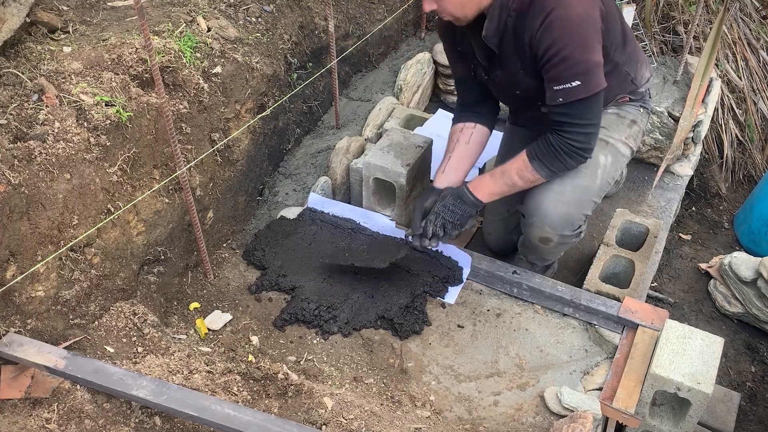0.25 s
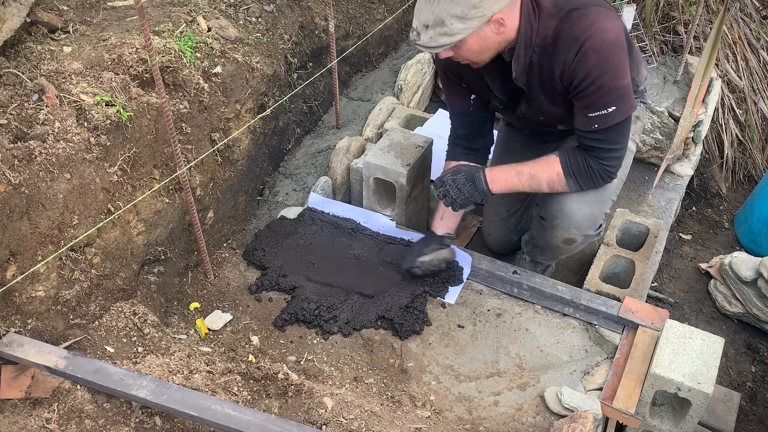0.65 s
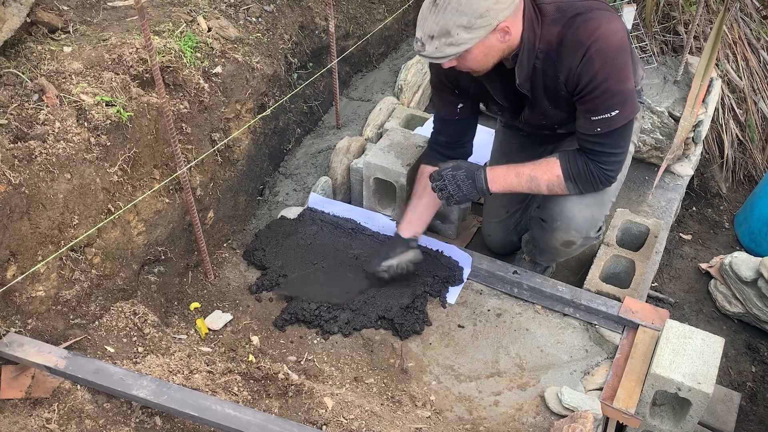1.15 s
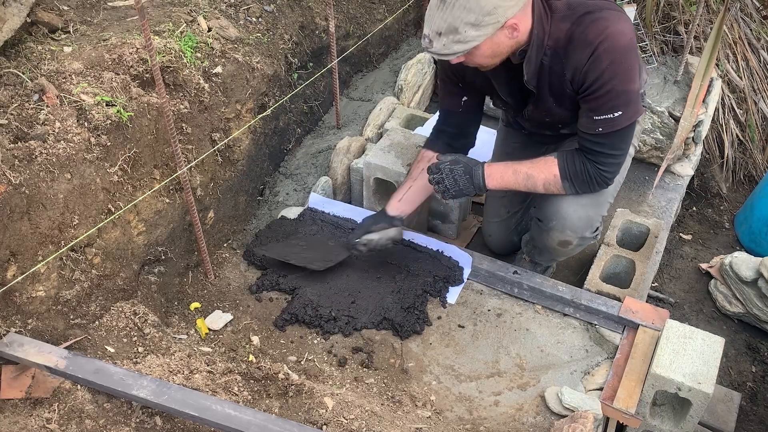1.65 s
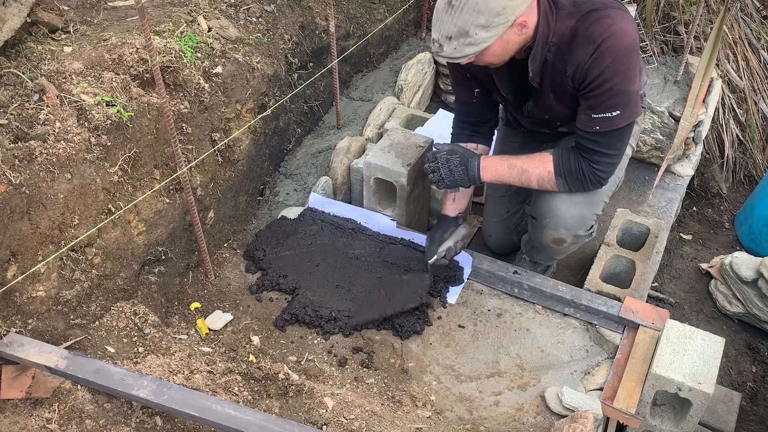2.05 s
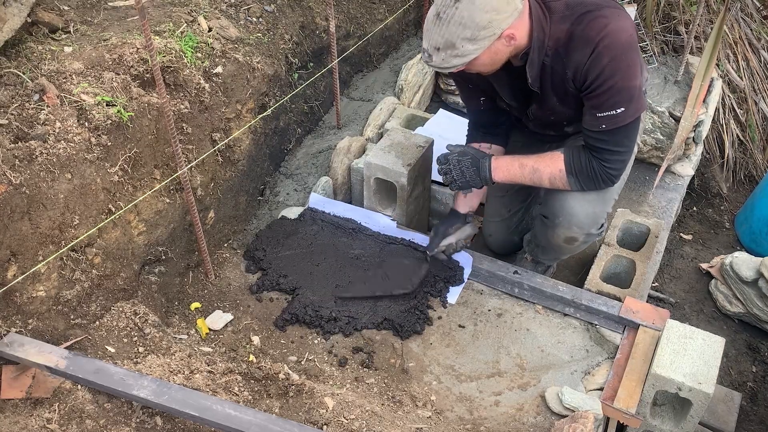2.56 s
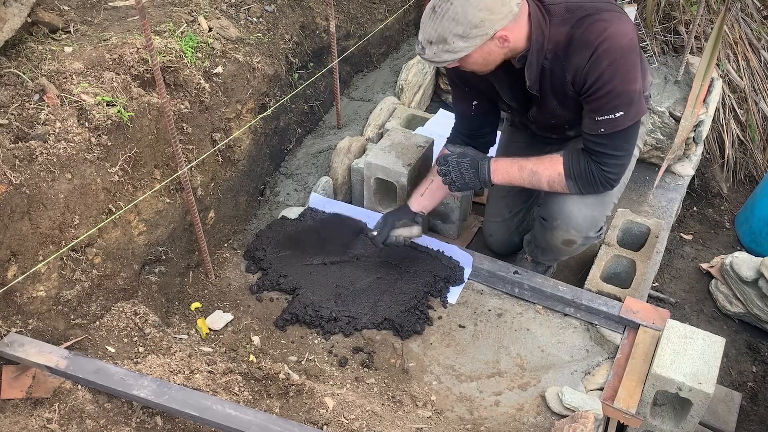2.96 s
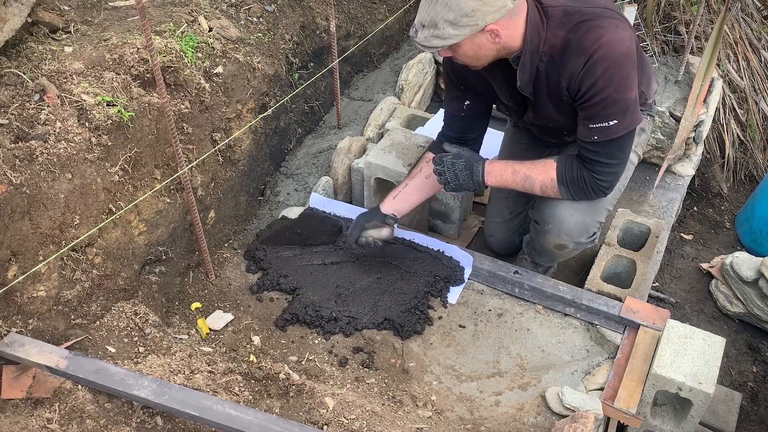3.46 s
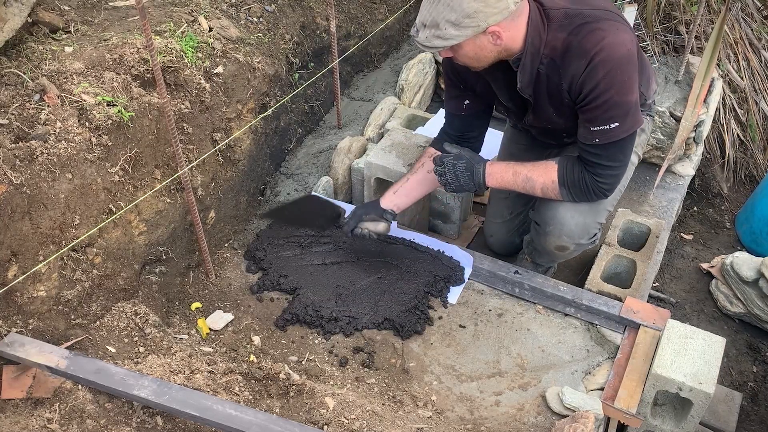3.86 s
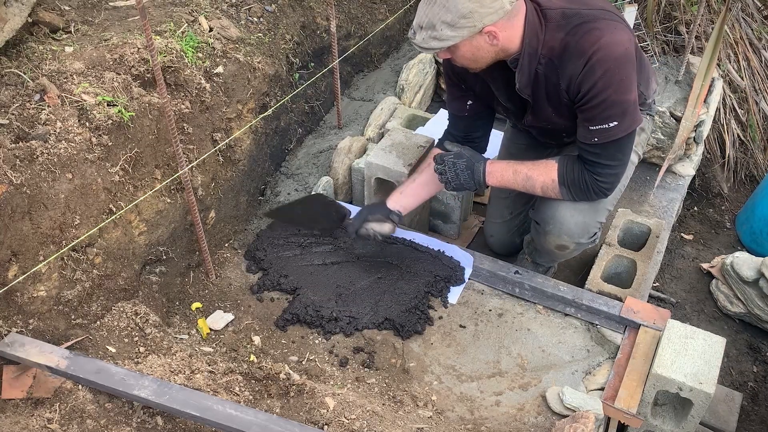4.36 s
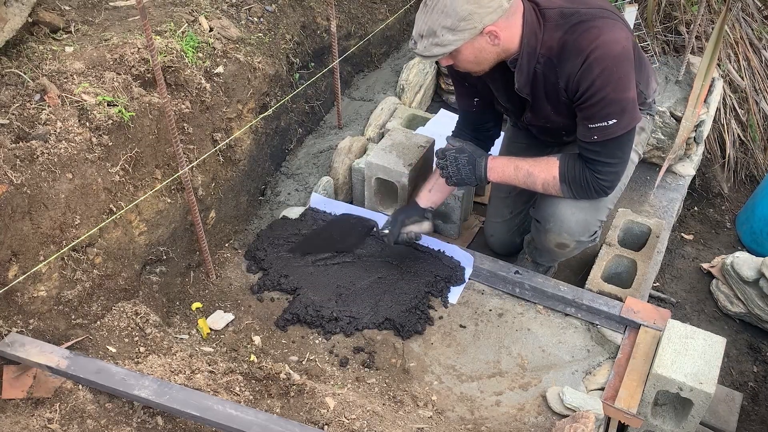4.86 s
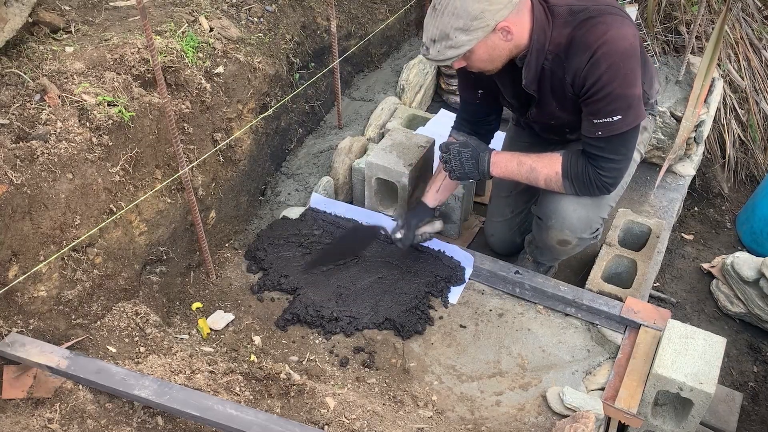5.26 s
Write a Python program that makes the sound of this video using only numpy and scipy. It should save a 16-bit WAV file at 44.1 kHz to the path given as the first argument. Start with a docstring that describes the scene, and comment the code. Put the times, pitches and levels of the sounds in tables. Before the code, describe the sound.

A steel trowel scrapes gritty wet concrete in short strokes, then pats it with quick wet slaps, outdoors over faint machine hum.

```python
"""A steel trowel works a heap of wet concrete in a shallow trench outdoors: gritty strokes spread it, built from
dense random ticks, coloured by sand, grit and steel. Between and after them the flat blade pats, at last about
six times a second: noise bursts spit, smack and knock, a falling sine thuds, and low modes ring in the base.
Stones click, paste fizzes off the steel, and the trench answers with short echoes made of decaying noise.
Behind lie noisy outdoor air and the hum of a far machine; a close pair of microphone ports picks it all up."""
import sys
import numpy as np
from scipy import signal
from scipy.fft import rfft, irfft, next_fast_len
from scipy.io import wavfile
from scipy.ndimage import uniform_filter1d, map_coordinates

SR = 44100
rng = np.random.default_rng(int(sys.argv[2]) if len(sys.argv) > 2 else 0)


def transcribe(u):
    """Save the signal u as a 16-bit wav file named by the first command-line argument.

    u: samples, shape (n,) or (channels, n), limited to [-1, 1]; the rate is SR.
    q: integer samples, one column per channel.
    """
    v = np.clip(np.atleast_2d(u).T, -1, 1)
    q = np.round(v * 32767).astype(np.int16)
    wavfile.write(sys.argv[1], SR, q)


N = 242991

# The blade spreads the heap: start_s, rise_s (time to full speed), length_s (rise included),
# level_db (relative peak), rise_db (swell up to the peak), wedge_hz (air wedge at full speed)
STROKE_MOVES = [(0.592, 0.11, 0.16, -21.5, 25, 2020), (0.781, 0.044, 0.11, -34, 3.5, 1893),
                (1.198, 0.073, 0.23, -24.5, 7.5, 2630), (1.794, 0.063, .22, -21, 10, 2890)]
# Fine sand ticking on steel: freq_hz, density_db (relative, per Hz)
SAND_SPECTRUM = [(3000, -30.5), (5000, -11), (6200, 0), (7200, 0), (8800, -3), (10500, -6), (12500, -9),
                 (15500, -15)]
# Coarser grit rasping on steel: freq_hz, density_db (relative, per Hz)
GRIT_SPECTRUM = [(500, -32.5), (900, -10), (1300, -4.5), (1900, -2.5), (3300, -0.5), (4200, -0.5),
                 (5500, -7), (8000, -31)]


def amp(db):
    """Decibels to gain."""
    return 10 ** (np.asarray(db) / 20)


def unit(x):
    """Scale to rms 1."""
    return x / np.sqrt(np.mean(x ** 2) + 1e-20)


def along(points, hz):
    """Interpolate (Hz, value) points on a log frequency axis."""
    f, v = np.transpose(points)
    return np.interp(np.log(hz + 1), np.log(f + 1), v)


def wobble(rate):
    """A smooth random curve, rate knots a second."""
    knots = rng.standard_normal(int(N * rate / SR) + 4)
    fine = np.arange(0, len(knots) - 1, 1 / 10)
    curve = map_coordinates(knots, [fine])
    return np.interp(np.arange(N) * rate / SR, fine, curve)


def filtered(x, response):
    """x times a complex response of frequency."""
    n = x.shape[-1]
    m = next_fast_len(n + 4096)
    return irfft(rfft(x, m) * response(np.fft.rfftfreq(m, 1 / SR)), m)[..., :n]


def causal(x, gain):
    """x through the minimum-phase filter of a gain over frequency: nothing sounds before its cause."""
    def response(f):
        cepstrum = irfft(np.log(np.abs(gain(f)) + 1e-6))
        half = len(cepstrum) // 2
        folded = np.r_[cepstrum[0], 2 * cepstrum[1:half]]
        return np.exp(rfft(folded, len(cepstrum)))
    return filtered(x, response)


def resonance(f, hz, width):
    """Response of one damped mode, 1 at its centre."""
    return 1j * f * width / (hz * hz - f * f + 1j * f * width)


def blade(f, ring_db=-5):
    """The damped steel plate adds its modes to whatever touches it."""
    # Modes of the plate: mode_hz, width_hz, level_db (relative)
    plate_modes = [(1560, 400, 2), (2650, 150, -3.5), (3030, 900, 2), (6700, 550, 0), (12190, 150, -25)]
    ring = sum(amp(db) * resonance(f, hz, width) for hz, width, db in plate_modes)
    return 1 + amp(ring_db) * ring


def coloured(x, spectrum):
    """x with the given spectrum and the colour of the blade, rms 1."""
    return unit(causal(x, lambda f: amp(along(spectrum, f)) * blade(f)))


def crackle(n, rate, spread_db):
    """Random ticks, rate a second on average, a few larger than the rest; rms 1."""
    size = amp(spread_db * np.minimum(rng.exponential(size=n), 3.5))
    return unit((rng.random(n) < rate / SR) * rng.choice([-1, 1], n) * size)


def strokes():
    """Sand and grit tick under the sliding blade, which catches and slips on the gravel."""
    # Low drag of the heap: freq_hz, density_db (relative, per Hz)
    drag_spectrum = [(60, -24.5), (140, -10.5), (270, -0.5), (450, -4.5), (620, -5), (800, -4.5),
                     (1100, -11.5), (2000, -26)]
    sand, grit, drag = contact()
    catch = amp(1.1 * wobble(50) + 1.1 * wobble(300))  # slow and fast unevenness
    gravel = crackle(N, rate=600, spread_db=2.6)  # shared by all three layers

    def grains(rate):
        return crackle(N, rate, spread_db=2) + .4 * gravel

    fine = amp(-1.0) * sand * coloured(grains(12000), SAND_SPECTRUM)
    rasp = shifting(coloured(grains(5000), GRIT_SPECTRUM), patchy_db=1.6, wedge_db=8.5)
    coarse = amp(1.5) * grit * rasp
    heap = amp(-2.5) * drag * coloured(grains(2500), drag_spectrum)
    return catch * (fine + coarse + heap)


def contact():
    """Gains of sand, grit and drag: all follow stroke effort; brushes add sand and grit, scuffs add drag."""
    # The blade brushes the surface lightly or flicks off it:
    # middle_s, length_s, sand_db (relative), grit_db (relative)
    brushes = [(0.016, 0.078, -43.5, -54.5), (0.242, 0.029, -56, -56), (0.324, 0.15, -56.5, -58.5),
               (0.414, 0.035, -44, -58), (0.526, 0.074, -59, -70.5), (0.962, 0.022, -50.5, -64.5),
               (1.496, 0.013, -39, -45.5), (2.036, 0.011, -41, -38), (2.068, 0.0093, -43.5, -52),
               (2.703, 0.3, -65.5, -70.5)]
    # The kneeling worker shifts with a soft scuff: middle_s, length_s, level_db (relative)
    scuffs = [(0.167, 0.05, -52), (0.219, 0.019, -46), (0.318, 0.25, -62.5), (0.412, 0.034, -52)]
    slowing_db_per_s, lift_db_per_s = 84, 429.5  # the arm slows, then the blade lifts
    grit_db = -4.5  # against sand
    usual_stroke_db, drag_db, drag_growth = -27, -42.5, 0.6  # growth: drag dB per dB of effort
    effort = sum(amp(db) * gesture(s, rise_s, length, rise_db, slowing_db_per_s, lift_db_per_s)
                 for s, rise_s, length, db, rise_db, _ in STROKE_MOVES)
    sand, grit = effort, amp(grit_db) * effort
    for s, length, brush_sand_db, brush_grit_db in brushes:
        touch = hump(s, length)
        sand = sand + amp(brush_sand_db) * touch
        grit = grit + amp(brush_grit_db) * touch
    drag = amp(drag_db) * (effort / amp(usual_stroke_db)) ** drag_growth
    scuffing = sum(amp(db) * hump(s, length) for s, length, db in scuffs)
    return sand, grit, drag + scuffing


def gesture(start, rise_s, length, rise_db, fade_db_per_s, release_db_per_s):
    """Gain that swells to 1, fades slowly until its length is up, and is then released."""
    age = np.arange(N) / SR - start
    rising = rise_db * np.clip(1 - age / rise_s, 0, 1)
    fading = fade_db_per_s * np.maximum(np.minimum(age, length) - rise_s, 0)
    released = release_db_per_s * np.maximum(age - length, 0)
    onset = np.exp(np.minimum(age, 0) / 0.0019)
    return amp(-rising - fading - released) * onset


def hump(middle, length):
    """Gain of one brief, rounded touch."""
    edge = 1.6  # the higher, the more abruptly it starts and stops
    return np.exp(-np.abs((np.arange(N) / SR - middle) / (length / 2)) ** edge)


def shifting(x, patchy_db, wedge_db):
    """The contact patch wanders, so the colour flickers; the air wedge under the blade adds a moving resonance."""
    hz, t, z = signal.stft(x, SR, nperseg=512)
    noise = rng.standard_normal(z.shape)
    field = uniform_filter1d(uniform_filter1d(noise, 4, 0), 4, 1)  # smooth over pitch, then time
    centre = wedge_pitch(t)
    depth = (2300 / centre) ** 2  # a long, low wedge rings more strongly
    wedge = depth * np.abs(resonance(hz[:, None], centre, 170)) ** 2
    colour = amp(patchy_db * unit(field) + wedge_db * wedge)
    return unit(signal.istft(z * colour, SR, nperseg=512)[1][:N])


def wedge_pitch(t):
    """In each stroke the note of the air wedge sinks as the blade flattens, and stays there until the next."""
    fall_oct_per_s = 2.0
    centre = np.full(len(t), float(STROKE_MOVES[0][-1]))
    for s, rise_s, length, _, _, hz in STROKE_MOVES:
        past_peak = np.minimum(t - s, length) - rise_s
        centre = np.where(t > s, hz * 2 ** (-fall_oct_per_s * past_peak), centre)
    return centre


def pats():
    """Every landing of the blade slaps the paste, thuds in the heap and shakes the base."""
    # The blade lands: touch_s, settle_s (time to lie flat), slap_db (relative), gap_hz (air gap),
    # thud_db (relative), thud_hz (nominal, before the glide)
    landings = [(0.5728, 0.006, -39, 2720, -53.5, 290), (1.1865, .0036, -27.5, 2860, -56.5, 235.2),
                (1.4825, 0.0072, -59.5, 2830, -64, 214.3), (1.7768, 0.0027, -30, 2810, -29.5, 254),
                (2.2261, 0.001, -23.5, 2030, -25.5, 257), (2.3745, 0.0029, -36, 2350, -40, 262),
                (2.5124, .0027, -35, 2570, -38, 258.5), (2.9306, 0.0081, -34.5, 1577, -45.5, 355),
                (3.119, .0063, -30.5, 2910, -44, 364.7), (3.3139, 0.0062, -32.5, 1510, -40.5, 280),
                (3.505, .0021, -31.5, 1347, -37, 282.7), (3.6775, 0.0052, -34, 2880, -48.5, 293),
                (3.8408, 0.008, -32.5, 2900, -44, 275.5), (4.0024, .011, -35, 1390, -47, 277),
                (4.1582, 0.0065, -36, 2880, -46, 272), (4.3309, 0.0075, -33, 1250, -50.5, 348),
                (4.503, 0.0079, -34.5, 2400, -36, 309.6), (4.6673, 0.0057, -29, 2670, -49.5, 308.4),
                (4.829, .0088, -31.5, 1810, -45, 273), (4.9792, .01, -32.5, 1660, -48, 256.8),
                (5.1634, .0034, -25, 2590, -44, 232.9), (5.3378, 0.0031, -24.5, 1620, -30.5, 323),
                (5.5066, .0048, -33, 1550, -59, 282)]
    # Patting moves on to wetter paste, then back: time_s, wetness (-1 to 1, no unit)
    wetness_curve = [(2.2, -1), (2.5, -0.6), (2.95, 0.32), (3.5, 0.99), (4.5, 0.73), (5.15, 0.7),
                     (5.4, 0.1)]
    usual_slap_db, usual_thud_db = -33.5, -44  # an ordinary pat
    spit_usual_db, spit_growth = -29, 0.88  # growth: dB per dB of slap
    knock_usual_db, knock_growth, knock_per_thud = -43, 1.31, .12  # dB per dB of slap and of thud
    ground_usual_db, ground_growth = -54, 0.8  # growth: dB per dB of thud
    wet_spit_db, sizzle_usual_db, wet_sizzle_db = 4, -2, 4  # wetter paste spits more, and finer
    burst_s, usual_settle_s, burst_power = .0025, .006, 0.6  # a tilted landing draws the burst out
    out, lead = np.zeros(N + SR), SR // 50
    t = np.arange(-lead, SR // 8) / SR  # 0 where the blade lies flat
    for s, settle, slap_db, gap_hz, thud_db, thud_hz in landings:
        at = round((s + settle) * SR)
        half = burst_s * (abs(settle) / usual_settle_s) ** burst_power
        faster, firmer = slap_db - usual_slap_db, thud_db - usual_thud_db
        wetness = np.interp(s, *np.transpose(wetness_curve))
        spit_db = spit_usual_db + spit_growth * faster + wet_spit_db * wetness
        sizzle_db = sizzle_usual_db + wet_sizzle_db * wetness
        knock_db = knock_usual_db + knock_growth * faster + knock_per_thud * firmer
        ground_db = ground_usual_db + ground_growth * firmer
        hit = slap(t, settle, half, spit_db, sizzle_db, slap_db, gap_hz, knock_db)
        out[at - lead:][:len(t)] += hit + thud(t, half, thud_db, thud_hz)
        base = ground(ground_db)
        out[at:][:len(base)] += base
    return out[:N]


def slap(t, settle, half, spit_db, sizzle_db, smack_db, gap_hz, knock_db):
    """The edge touches, the gap closes and paste and air squirt out: a burst of milliseconds, then a wet fizz."""
    # Spray of paste: freq_hz, density_db (relative, per Hz)
    spit_spectrum = [(2500, -43.5), (4500, -16.5), (5500, -14), (6300, -2), (8200, -6.5), (10000, -7),
                     (13000, -9.5), (15500, -13.5)]
    # Air squeezed from the gap: freq_hz, density_db (relative, per Hz)
    smack_spectrum = [(600, -26.5), (1000, -1), (1500, -1), (2700, -1.5), (4000, -4), (5500, -6.5),
                      (9000, -34.5)]
    # Low knock of the landing: freq_hz, density_db (relative, per Hz)
    knock_spectrum = [(90, -45), (150, -18), (220, 2), (330, -3.5), (480, 0), (580, 0), (750, -1.5),
                      (1050, -10), (1300, -4.5), (2500, -38.5)]
    swell = (t / (1.64 * half)) ** 2
    decay = np.abs(t) / (2.15 * half)
    burst = np.exp(-np.where(t < 0, swell, decay))
    # the edge's first touch, held until the blade lies flat
    touch = 0.41 * np.exp(np.minimum(t + settle - .0005, 0) / 0.00054) * (t < 0)
    fizz = amp(-20.5) * (t > 0) * amp(-60 * np.abs(t) / 0.11)
    wet = np.maximum(burst, touch) + fizz

    def squirt(shape):
        return shape * crackle(len(t), rate=15000, spread_db=0.7)

    # wetter paste sprays finer: a treble tilt
    spray = filtered(squirt(wet), lambda f: amp(sizzle_db * along([(7500, 0), (13000, 1)], f)))
    gap = filtered(squirt(wet), lambda f: 1 + resonance(f, gap_hz, 450))
    spit = amp(spit_db - 8.0) * coloured(spray, spit_spectrum)
    smack = amp(smack_db - 10.0) * coloured(gap, smack_spectrum)
    knock = amp(knock_db - 8.5) * coloured(squirt(burst + fizz), knock_spectrum)
    return spit + smack + knock


def thud(t, half, db, hz):
    """The blade's note drops as the heap loads it; a firm press rings longer."""
    age = np.maximum(t + 0.66 * half, 0)
    fast_drop = 1 + 2 * np.exp(-age / 0.0022)
    slow_drop = .86 + 0.192 * np.exp(-age / 0.0087)
    pitch = hz * fast_drop * slow_drop
    t60 = 0.028 * amp(0.038 * (db + 35))
    swell = (1 - np.exp(-age / 0.011)) ** 2
    note = np.sin(2 * np.pi * np.cumsum(pitch) / SR)
    return amp(db - 5.5) * unit(note * swell * amp(-60 * age / t60))


def ground(db):
    """The packed base under the heap rings in a few low modes, varied at random for each pat."""
    # Modes of the packed base: mode_hz (nominal), level_db (relative), t60_s
    base_modes = [(103.8, -9.5, 0.42), (136.5, -2, 0.17), (192, 6.5, 0.069)]
    age = np.arange(SR // 3) / SR
    base = np.zeros(len(age))
    for hz, mode_db, t60 in base_modes:
        decay = amp(mode_db + rng.normal(0, 4.7) - 60 * age / t60)
        base += decay * np.sin(2 * np.pi * hz * rng.normal(1, 0.085) * age)
    swell = 1 - np.exp(-age / 0.0032)
    return amp(db - 6.0) * unit(base * swell)


def stones():
    """Single stones click against the steel: decaying noise snaps with the colours of sand and grit."""
    # A stone snaps out from under the edge: time_s, level_db (relative)
    snaps = [(0.717, -17), (1.2761, -23), (1.647, -54.5), (1.9299, -19.5), (2.0273, -24)]
    out, t = np.zeros(N + SR), np.arange(SR // 50) / SR
    for s, db in snaps:
        snap = rng.standard_normal(len(t)) * amp(-60 * t / 0.016)
        click = coloured(snap, SAND_SPECTRUM) + amp(-9.0) * coloured(snap, GRIT_SPECTRUM)
        out[round(s * SR):][:len(t)] += amp(db - 12.5) * click
    return out[:N]


def peels():
    """Wet paste fizzes as it lets go of the steel: crackle that swells, then dies fast."""
    # The blade peels off after a firm press: let_go_s, level_db (relative)
    releases = [(2.298, -37), (2.452, -35.5), (2.58, -36)]
    swell_s, swell_db, let_go_db_per_s = 0.03, 5.5, 563
    level = sum(amp(db) * gesture(s - swell_s, swell_s, swell_s, swell_db, 0, let_go_db_per_s)
                for s, db in releases)
    fizz = crackle(N, rate=2400, spread_db=5.0)
    fine = amp(-9.0) * coloured(fizz, SAND_SPECTRUM)
    coarse = amp(-12.5) * coloured(fizz, GRIT_SPECTRUM)
    return level * (fine + coarse)


def walls(x):
    """Blocks beside the heap scatter the treble with opposite sign into each port, in a drifting pattern."""
    t = np.arange(SR // 200) / SR
    treble = signal.sosfilt(signal.butter(2, 900, "high", fs=SR, output="sos"), x)
    side = np.zeros(N)
    for scatter in rng.standard_normal((4, len(t))) * np.exp(-t / .0015):
        scattered = signal.oaconvolve(treble, scatter / np.linalg.norm(scatter))[:N]
        side += wobble(9) * scattered / 2
    return np.array([side, -side])


def trench(x):
    """Earth walls and blocks answer briefly: decaying noise echoes, drawn afresh each sixth of a second."""
    # Decay of the trench before the walls end: freq_hz, t60_s
    trench_decay = [(100, 0.23), (300, 0.26), (1000, 0.11), (3000, 0.25), (7000, 0.19), (15000, 0.28)]
    out, step = np.zeros((2, N + SR)), SR // 6
    for start in range(0, N, step):
        hz, t, z = signal.stft(rng.standard_normal((2, SR // 4)), SR, nperseg=256)
        reach = 1 - 0.8 / (1 + np.exp(-(t - .068) / .004))  # beyond the last walls lies open ground
        near = 1 + 0.47 * np.exp(-t / 0.011)  # the blocks right beside the heap
        decay = amp(-60 * t / along(trench_decay, hz)[:, None])
        tail = signal.istft(z * near * reach * decay, SR, nperseg=256)[1]
        tail = tail + .2 * tail[::-1]  # the close ports share part of each echo
        tail = tail / np.linalg.norm(tail[0])
        echo = signal.fftconvolve(x[None, start:start + step], tail, axes=1)
        out[:, start + round(.002 * SR):][:, :echo.shape[1]] += echo
    return out[:, :N]


def site():
    """Outdoor air as shaped noise, with the unsteady hum (sines) and whine (narrow noise) of a far machine."""
    # Outdoor air: freq_hz, density_db (relative, per Hz)
    air_spectrum = [(25, -28), (50, -2), (110, 1.5), (160, -2.5), (260, -9.5), (480, -6.5), (850, -19),
                    (1400, -21.5), (2000, -29.5), (5000, -29.5), (6600, -21.5), (7600, -32), (11000, -36.5),
                    (15500, -40)]
    # The background hiss sinks and swells: time_s, gain_db
    hiss_curve = [(0, 9), (1.05, -2), (1.7, -1), (2.2, 2.5), (2.9, 2), (5.5, 5)]
    # Tones of the far machine: tone_hz, level_db (relative)
    hum_tones = [(96.9, -68.5), (199.2, -67.5), (296.1, -73), (500.6, -77), (1034, -86), (1082, -83),
                 (1179, -86.5), (1281, -81)]
    t = np.arange(N) / SR
    noise = rng.standard_normal((2, N)) + .6 * rng.standard_normal(N)  # partly common to both ports
    air_level = amp(-61.0 + 0.73 * wobble(0.96))
    air = air_level * unit(filtered(noise, lambda f: amp(along(air_spectrum, f))))
    rumble = filtered(air, lambda f: 1 / (1 + (f / 1400) ** 4))
    hiss = (air - rumble) * amp(np.interp(t, *np.transpose(hiss_curve)))
    hum = np.zeros(N)
    for hz, db in hum_tones:
        level = amp(db + 2.5 + 1.6 * wobble(2.1))
        hum += level * np.sin(2 * np.pi * hz * t + .5 * wobble(5.7))
    whine = amp(-70) * unit(filtered(rng.standard_normal(N), lambda f: resonance(f, 1170, 150) ** 2))
    return rumble + hiss + hum + whine


def scene():
    """The trowel, its echoes and the site around it."""
    sliding = strokes() + stones() + peels()
    patting = pats()
    scattered = walls(amp(-12) * sliding + amp(-17) * patting)
    tilted = amp(-10) * sliding  # the tilted blade throws more sound at the walls
    echoes = trench(tilted + amp(-11.5) * patting)
    return sliding + patting + scattered + echoes + site()


def record(dry):
    """The recorder's body shades and delays one port against the other; a steep band limit cuts the top."""
    # Level between the two microphone ports: freq_hz, left_minus_right_db
    port_balance = [(100, 3.7), (260, 0.7), (480, -0.1), (780, 9.1), (1300, 7.8), (2000, 9.3), (3300, 7.5),
                    (4500, -1.1), (5550, -7.2), (6400, -0.4), (7700, 1.8), (9000, 0.4)]
    # Phase between the two ports: freq_hz, left_lead_rad
    port_phase = [(700, 0.1), (1300, -0.7), (1900, -0.2), (2600, 1.8), (4000, 0.6), (5300, 1.9),
                  (6300, 0.1), (7500, -1.5), (8550, -3.2), (10800, -6.2), (12000, -7.5), (13550, -9.5),
                  (15500, -12.3)]
    top_hz = 15900

    def ports(f):
        side = np.array([[.5], [-.5]])
        gain = amp(side * along(port_balance, f))
        phase = np.interp(f, *np.transpose(port_phase))
        even_power = gain / np.sqrt(np.mean(gain ** 2, axis=0))
        return even_power * np.exp(1j * side * phase)

    return filtered(filtered(dry, ports), lambda f: 1 / np.sqrt(1 + (f / top_hz) ** 160))


dry = scene()
out = record(dry)
transcribe(out)
```